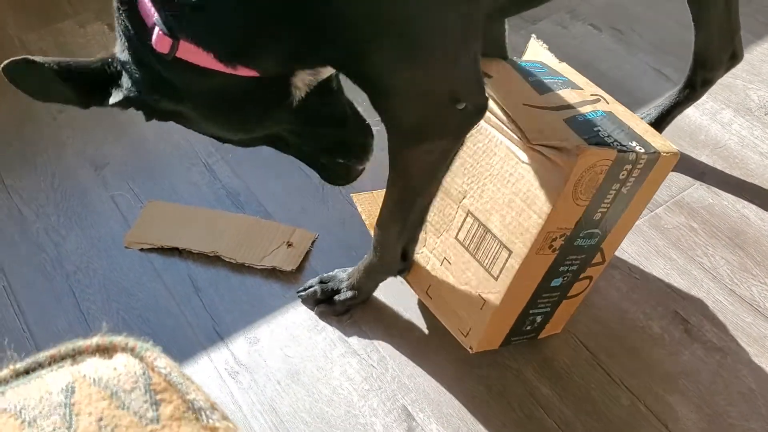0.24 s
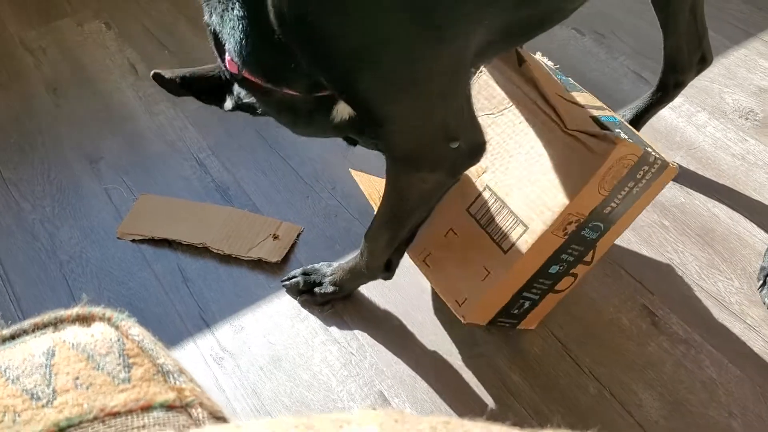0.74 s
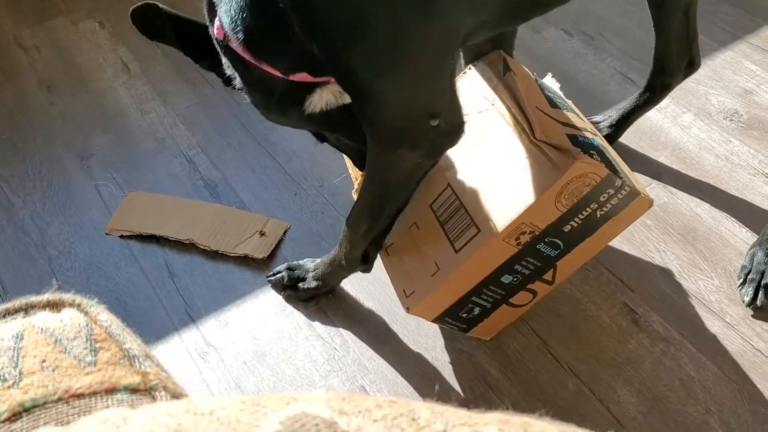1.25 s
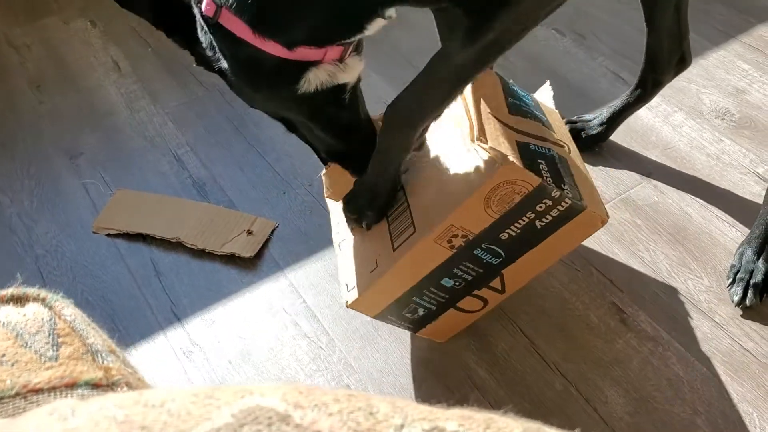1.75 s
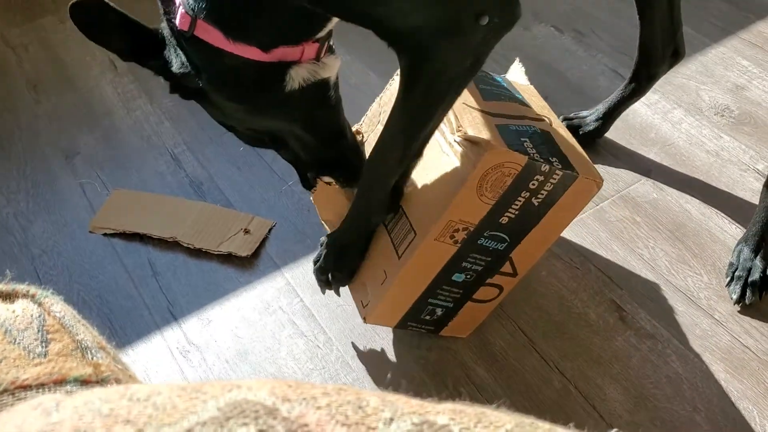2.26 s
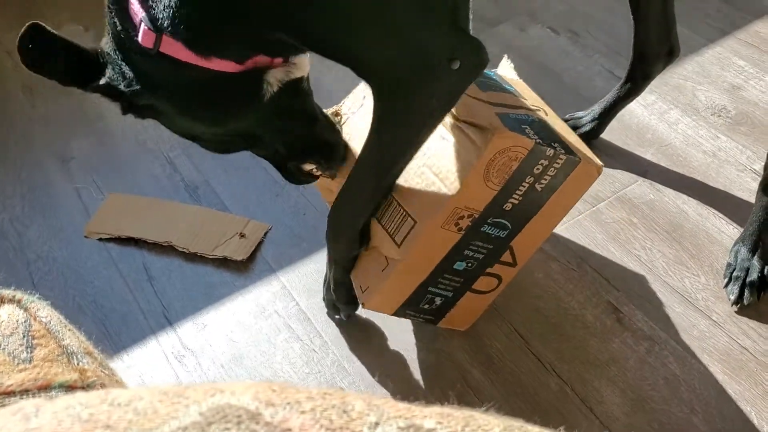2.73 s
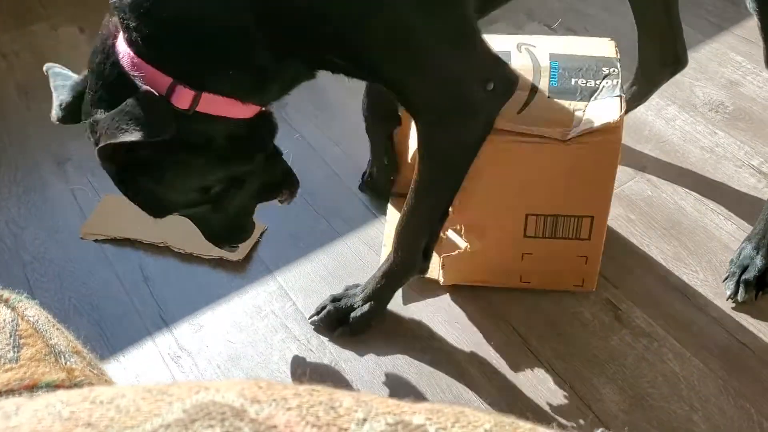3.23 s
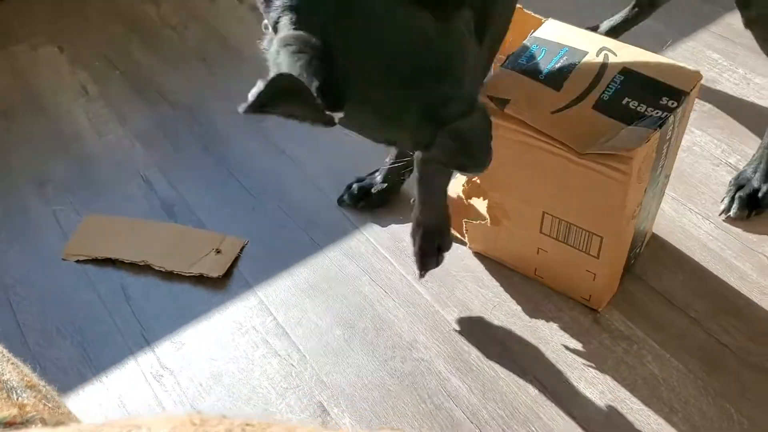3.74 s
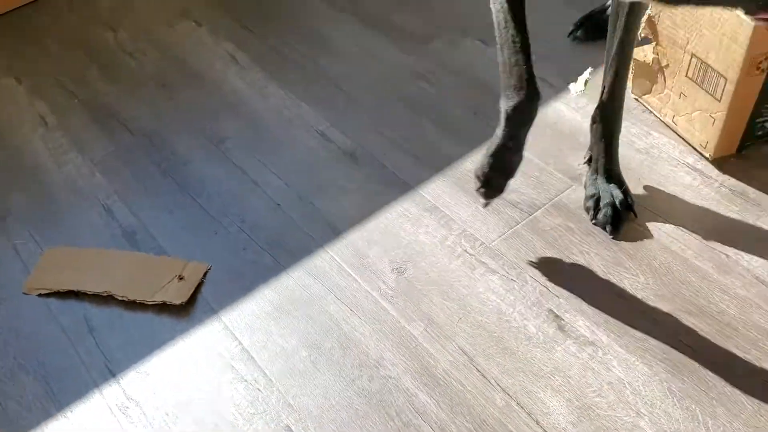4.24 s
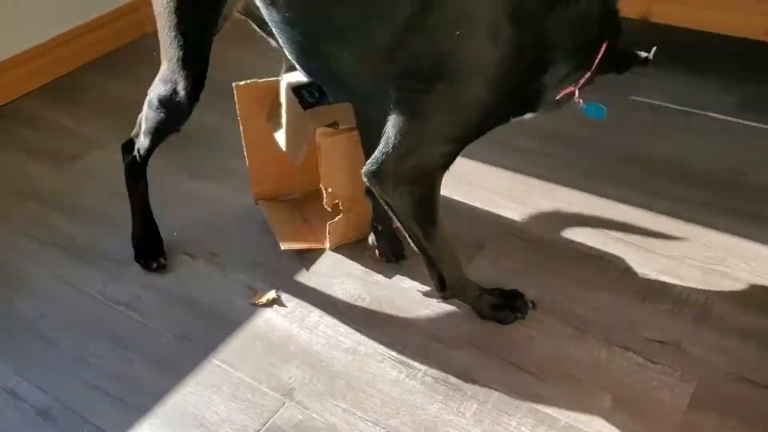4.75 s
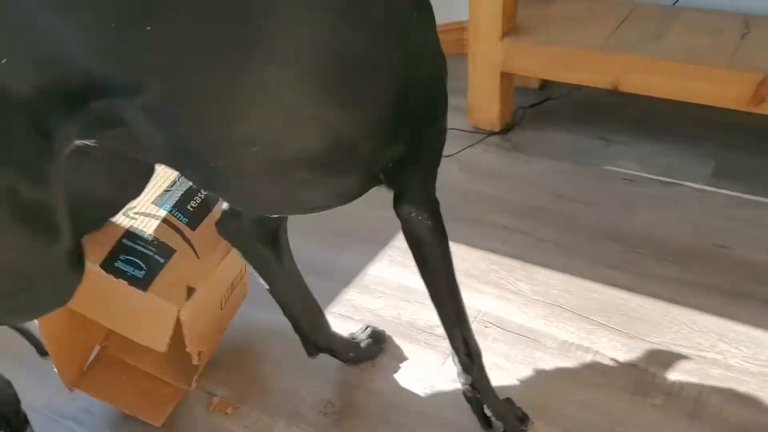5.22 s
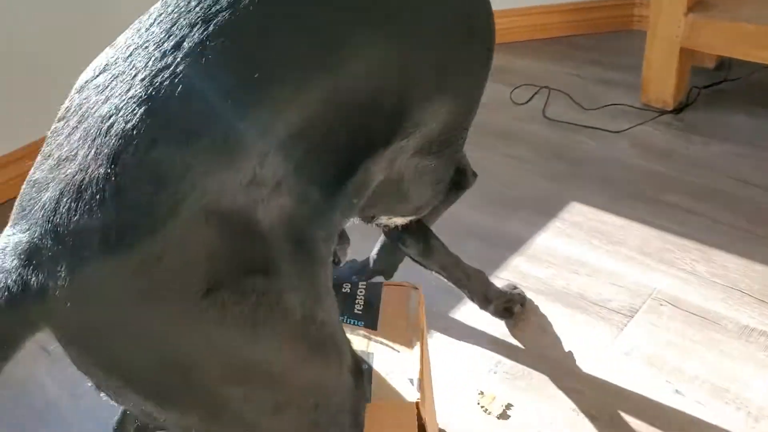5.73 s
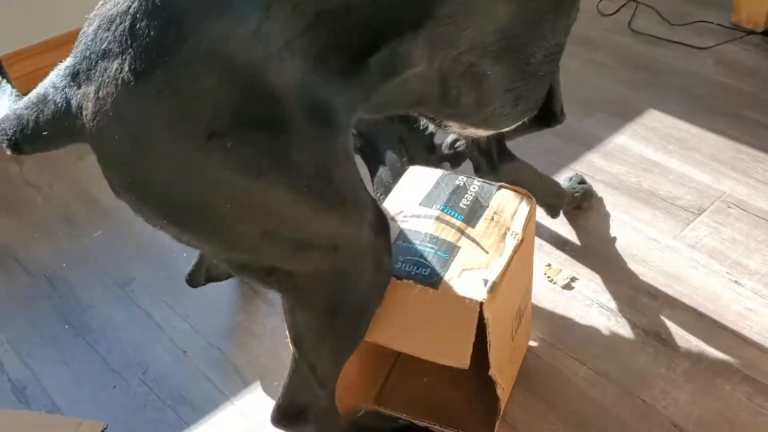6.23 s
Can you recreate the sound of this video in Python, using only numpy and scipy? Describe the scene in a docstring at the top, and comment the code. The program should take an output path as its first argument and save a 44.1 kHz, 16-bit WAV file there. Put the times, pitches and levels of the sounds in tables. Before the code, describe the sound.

A dog bites and tears a cardboard box, with loud sharp cracks, short rips and hollow knocks on a hard living-room floor.

```python
"""First comes the end of a faint drag with a low rumble, then loud cracks, a rip and hollow knocks: close by,
a dog bites, tears and shoves a cardboard box over a hard floor in a living room. Creases, rips and skids are
noise bursts and tiny random breaks through cardboard spectra; knocks and a collar tag are decaying modes.
Drags rub and rumble on and off beneath, over faint steady air; every sound gets scatter and a room tail."""
import sys
import numpy as np
from scipy import signal
from scipy.fft import rfft, irfft
from scipy.io import wavfile

SR = 44100
rng = np.random.default_rng(int(sys.argv[2]) if len(sys.argv) > 2 else 0)


def unload_wav(signal):
    """Save mono or channel-first audio to the path in sys.argv[1] as 16-bit WAV at rate SR, clipped to [-1, 1]."""
    wavfile.write(
        sys.argv[1],
        SR,
        np.round(np.clip(np.atleast_2d(signal).T, -1, 1) * 32767).astype(np.int16),
    )


N = 285900

# Event levels are balanced among themselves; each layer then has its own trim.
# a crease or flute of the cardboard snaps: [t/s, level/dB, body below 1 kHz/dB, crumpling after it/dB]
CREASE_SNAPS = [(0.101, 0, 7.5, 3.5), (0.194, 0, 4.5, -25), (0.205, -3.5, 1, -10), (0.799, -21.5, 0, 5.5),
                (1.005, -2.5, -4, -2), (1.176, -5.5, 7.5, 6), (1.225, -2, 8, -8), (1.315, -1.5, 0.5, 1),
                (1.446, 3, 5, -4), (1.705, -19, 5, 10.5), (1.809, -6.5, -4.5, -15), (2.022, -12, 1.5, 5),
                (2.175, -2, 1, -5), (2.22, -6, 10.5, 7.5), (2.234, -12.5, 4, 0), (2.293, -5.5, -5, 12),
                (2.572, -20.5, -8, 11.5), (2.801, -3.5, -5, 2), (2.854, -8, -0.5, 13),
                (3.876, -14.5, 14, 11), (3.922, -12, 10, -4), (4.465, -20, -7, 11),
                (4.712, -11.5, 10, 10.5), (4.734, -2, 20, -1), (5.168, -11, 38, 13), (5.238, -12, 29, 13),
                (5.395, -18, -24, 15), (5.452, -18.5, 3, 8.5), (6.014, -26.5, 5, 7.5),
                (6.262, -20.5, 7, 1.5), (6.308, -25, -8, 4)]
# the teeth rip the cardboard: [start t/s, end t/s, level/dB]
TEETH_TEARS = [(0.101, 0.22, -34.5), (0.581, 0.813, -58.5), (1.179, 1.212, -39), (1.225, 1.274, -36),
               (1.463, 1.506, -39.5), (1.945, 2.037, -33.5), (2.176, 2.25, -29), (2.292, 2.323, -29.5),
               (2.565, 2.618, -37), (3.027, 3.085, -40.5), (3.76, 3.811, -35), (3.85, 3.922, -32),
               (4.003, 4.068, -53), (4.237, 4.316, -37), (5.053, 5.087, -38.5)]
# the box or a paw knocks on the floor: [t/s, level/dB, strongest ring f/Hz, hollow ring level/dB]
FLOOR_KNOCKS = [(0.124, -3, 75, -20.5), (0.195, -8.5, 538, -4.5), (0.206, -2.5, 175, -7),
                (0.221, -12, 77.7, -9), (0.745, -33.5, 85, -5.5), (0.8, -11.5, 174.6, -18),
                (1.231, -17, 553, -3.5), (1.335, -20.5, 181, -23), (1.554, -23.5, 185, -30),
                (1.704, -26.5, 355, 0), (2.023, -14, 93, -12), (2.227, -13.5, 174, -8),
                (2.584, -16.5, 92, -27), (2.8, -10, 490, -4.5), (2.857, -9, 240, -11),
                (2.883, -4.5, 116, -14.5), (3.274, -17.5, 74, -16.5), (3.336, -19.5, 83, -18),
                (3.871, -16, 583, -6.5), (3.924, -12.5, 309, -6.5), (4.111, -10.5, 310, -14.5),
                (4.264, -21, 83, -3.5), (4.304, -13, 310, -31), (4.365, -12, 97, -8.5),
                (4.391, -14, 253, -11), (4.443, -22.5, 74, -0.5), (4.644, -22, 137, -8.5),
                (4.737, -7, 623, -9), (4.8, -4.5, 337, -5.5), (4.974, -10, 420.5, -9.5),
                (5.165, -6.5, 132, -8.5), (5.233, -14, 470, -5), (5.285, -3.5, 152, -6),
                (5.404, -10, 464.4, -4.5), (5.524, -15, 114, -18), (5.64, -20, 106, -6),
                (6.087, -16.5, 144, -13.5), (6.165, -23, 98, -35), (6.314, -20, 85.3, -28)]
# a corner of the box or a paw skids on the floor: [start t/s, end t/s, level/dB, body level/dB]
FLOOR_SCRAPES = [(0.185, 0.217, -41, 25.5), (0.476, 0.59, -46, 2), (2.813, 2.883, -27.5, -1.5),
                 (3.106, 3.137, -40, -0.5), (3.242, 3.282, -32, -4), (3.409, 3.422, -39, -8),
                 (3.913, 3.948, -25.5, 1.5), (4.372, 4.528, -37.5, 2), (4.583, 4.605, -22, -11),
                 (4.725, 4.761, -21.5, 4), (4.752, 4.796, -25, -8), (5.16, 5.194, -36, 2.5),
                 (5.222, 5.3, -27.5, 2.5), (5.568, 5.588, -30.5, -10), (6.027, 6.146, -42.5, 7),
                 (6.363, 6.413, -42.5, -15)]
# a claw clicks on the boards: [t/s, level/dB]
CLAW_CLICKS = [(3.236, -8), (3.939, -11), (4.046, -13), (4.587, -7.5), (5.276, -8), (5.524, -15.5),
               (5.571, -8)]
# the dog drags or worries the box: [start t/s, end t/s, level/dB, rumble re level/dB],
# with the rumble high when its weight is on the box
BOX_DRAGS = [(-0.03, 0.055, -43, 3), (0.2, 0.288, -49, 14), (0.353, 0.818, -52, 2), (0.802, 0.89, -44, 3.5),
             (0.996, 1.033, -43.5, 0), (1.19, 1.39, -45.5, 3), (1.476, 1.587, -37.5, -10),
             (1.712, 1.863, -40.5, -5), (1.908, 2.172, -40.5, -1.5), (2.133, 2.333, -40.5, 4),
             (2.347, 2.54, -45, -18), (2.53, 2.795, -40.5, -5), (2.855, 2.988, -38.5, 3.5),
             (2.996, 3.207, -42, -6), (3.3, 3.484, -46, 5.5), (3.803, 4.086, -38, 3.5),
             (4.084, 4.24, -43, 2), (4.273, 4.717, -35.5, 3), (4.69, 4.92, -40, 10),
             (4.94, 5.163, -42.5, 1), (5.172, 5.454, -36.5, 6.5), (5.535, 5.77, -43, 2.5),
             (5.991, 6.19, -44.5, 8.5), (6.238, 6.448, -48, -2)]
# the collar tag clinks: [t/s, level/dB, brightness/dB per octave, share of its free ringing time]
TAG_CLINKS = [(3.657, -47, -2, 0.36), (4.386, -31, 6, 0.31)]

# modes of the box on the floor, before each blow detunes them: [f/Hz, level/dB, t60/s]
BOX_MODES = [(65.5, 1.5, 0.2), (77.1, 3.5, 0.29), (105, 5, 0.17), (161.7, 8.5, 0.13), (180.5, 0, 0.26),
             (253.3, -3.5, 0.18), (320.2, 3, 0.09), (398.5, 1, 0.08), (455, 2, 0.12), (543, -5.5, 0.13),
             (624, -13, 0.19), (872, -12.5, 0.11)]
# modes of the metal tag when it swings free: [f/Hz, level/dB, t60/s]
TAG_MODES = [(4715, -1, .6), (4880, -10, .2), (5405, -11, .2), (6406, 0, .28), (8931, -15, .2),
             (11250, -11, .4), (12885, -3, .3), (14358, -3, .28)]
# short resonances of a cardboard flap, before each bend shifts them: [f/Hz]
FLAP_RINGS = [900, 1430, 1530, 3504]

# Spectra give only the tone colour: each filter is scaled to energy 1.
# splitting cardboard: [f/Hz, level/dB]
CRACK_SPECTRUM = [(80, -22), (250, -7), (500, -1), (1000, 1), (1600, -1), (2200, -4), (3400, 0), (5500, -5),
                  (8500, -13), (12300, -8), (16000, -9)]
# teeth or edges rasping over the fibres: [f/Hz, level/dB]
RASP_SPECTRUM = [(700, -15.5), (1500, -13), (2200, -5), (3300, -1), (4500, -3), (6000, -3), (8500, -11.5),
                 (10500, -11.5), (12300, -6), (14500, -12), (16000, -19)]
# the panels shaken by the rasp: [f/Hz, level/dB]
BODY_SPECTRUM = [(150, -1.5), (330, 6.5), (480, 8.5), (630, 4), (760, 0.5), (920, 2.5), (1300, -3),
                 (1700, -7), (2500, -13.5), (5000, -57)]
# the fizz of parting fibres: [f/Hz, level/dB]
FIZZ_SPECTRUM = [(3000, -30), (6000, -8), (8500, -4), (12500, 0), (16000, -4)]
# the rumble inside the dragged box: [f/Hz, level/dB]
RUMBLE_SPECTRUM = [(15, -35), (32, -25.5), (50, 2), (75, 6.5), (130, 1.5), (175, 0.5), (210, -2),
                   (320, -3.5), (375, -15), (450, -14.5), (650, -12), (1500, -61.5)]
# the faint steady noise: [f/Hz, level/dB]
AIR_SPECTRUM = [(20, -6), (60, 0), (200, -2), (1000, -11), (4000, -17), (16000, -28)]

# reverberation of the room: [f/Hz, t60/s]
ROOM_T60 = [(100, 0.13), (260, 0.52), (700, 0.34), (1840, 0.43), (4850, 0.24), (12800, 0.24)]
# room tail against direct sound, before each layer's wet trim: [f/Hz, level/dB]
ROOM_WET = [(60, -3), (250, -5), (600, -1), (1200, 4), (4000, 1.5), (11000, 2), (15500, -3)]
# left-right likeness of the room tail: [f/Hz, likeness 0 to 1, clipped at 1]
ROOM_LIKENESS = [(60, 1), (130, 1), (250, 0.66), (500, 0.71), (1000, 0.039), (2000, 0.01)]
# left microphone minus right: [f/Hz, level/dB]
MIC_BALANCE = [(100, -1), (900, 0), (2000, -1.5), (4000, -7), (8000, -5), (12500, -8)]

SPLIT_S = 0.0014  # decay constant of a splitting crease
PANEL_T60_S = 0.13  # how long the struck panel rings
# thud of a panel that rings at 100 Hz, before the layer trim; small, higher panels thud less
THUD_DB, THUD_DB_PER_OCTAVE = -13, -2
DRAG_RISE_S, DRAG_SAG_DB_PER_S = 0.02, 9.5  # a drag takes hold quickly and tires
RASP_STOP_DB_PER_S, RUMBLE_STOP_DB_PER_S = 133, 105.5  # once it ends, the rumble outlasts the rasp
AIR_DB = -67  # rms of the air before the room
EDGE_HZ = 15950  # upper band limit


def snaps(level_db=2, wet_db=-2, treble_db=0.0, lag_s=0.0014):
    """Creases give way: the larger the panel that they shake, the more body the crack has."""
    out = np.zeros((2, N))
    for s, db, body_db, crumple_db in CREASE_SNAPS:
        snap = gain_of(db + level_db) * crack(crumple_db, body_db, treble_db)
        add(out, s + lag_s, room(snap, wet_db))
    return out


def crack(crumple_db, body_db, treble_db, split_db=3, crumple_s=0.006, flap_db=-8, flap_s=0.002,
          flap_db_per_octave=5, count=3000):
    """A millisecond of splitting, a brief ring of the flap, then crumpling that dies away."""
    t = np.arange(count) / SR
    split = rng.standard_normal(count) * np.exp(-t / SPLIT_S)
    crumple = fibres(count, per_s=1500, spread_db=9, hiss=0.18) * np.exp(-t / crumple_s)
    # each bend stiffens the flap differently; a quick snap favours the high ring
    flap_hz = np.array(FLAP_RINGS) * rng.uniform(0.97, 1.06, len(FLAP_RINGS))
    flap_gain = gain_of(flap_db_per_octave * np.log2(flap_hz / flap_hz[0]))
    flap = flap_gain @ np.sin(2 * np.pi * flap_hz[:, None] * t) * np.exp(-t / flap_s)
    parts = [(split_db, split), (crumple_db, crumple), (flap_db, flap)]
    force = sum(gain_of(part_db) * part / np.linalg.norm(part) for part_db, part in parts)
    shade = [(900, body_db), (2600, 0), (5000, 0), (9500, treble_db)]  # f/Hz, level/dB
    return signal.fftconvolve(force, pulse(CRACK_SPECTRUM, shade))


def tears(level_db=-3, wet_db=-1, body_db=-1.0, fizz_db=-3.5):
    """Ripping cardboard: rasp, body and the fizz of parting fibres, always in the same blend."""
    out = np.zeros((2, N))
    for start, end, db in TEETH_TEARS:
        rip = gain_of(db + level_db) * stroke(end - start, body_db, fizz_db)
        add(out, start, room(rip, wet_db))
    return out


def stroke(length_s, body_db, fizz_db, taper=0.36):
    """A run of fibres catches and breaks in quick succession and shakes the panel around it."""
    count = round(max(length_s, 0.005) * SR)
    breaks = fibres(N // 20, per_s=900, spread_db=4.5, hiss=0.25)
    force = (breaks * clumps(N // 20, spread_db=3.5, per_s=170))[:count]
    force = evened(force) * signal.windows.tukey(len(force), taper)
    body = gain_of(body_db) * pulse(BODY_SPECTRUM)
    fizz = gain_of(fizz_db) * pulse(FIZZ_SPECTRUM)
    return signal.fftconvolve(force, pulse(RASP_SPECTRUM) + body + fizz)


def knocks(ring_db=-5, modes_db=6.0, wet_db=-2, rise_s=0.0027, detune=0.067, count=10000):
    """Each blow rings one struck panel and the box's modes, a little detuned as it is bent."""
    out, t = np.zeros((2, N)), np.arange(count) / SR
    mode_hz, mode_db, mode_t60 = np.transpose(BOX_MODES)[:, :, None]
    for s, db, hz, hollow_db in FLOOR_KNOCKS:
        bend, phase = rng.uniform(-0.89, 1, (2, len(BOX_MODES), 1))
        thud_db = THUD_DB + THUD_DB_PER_OCTAVE * np.log2(hz / 100)
        # low modes follow the thud, high modes the hollow ring
        weight_db = read([(100, thud_db), (350, hollow_db)], mode_hz) + mode_db - 60 * t / mode_t60
        bent_hz = mode_hz * (1 + detune * bend)
        modes = gain_of(weight_db) * np.sin(2 * np.pi * bent_hz * t + np.pi * phase)
        hollow = gain_of(modes_db) * modes.sum(0) / np.sqrt(len(BOX_MODES))
        panel = gain_of(ring_db - 60 * t / PANEL_T60_S) * np.sin(2 * np.pi * hz * t)
        contact = 1 - np.exp(-t / rise_s)  # soft cardboard takes up the blow gradually
        add(out, s, room(gain_of(db) * contact * (panel + hollow), wet_db))
    return out


def scrapes(level_db=-3, wet_db=-1, fizz_db=-19):
    """Skids on the boards: little fizz, and as much body as the box is pressed down."""
    out = np.zeros((2, N))
    for start, end, db, body_db in FLOOR_SCRAPES:
        skid = gain_of(db + level_db) * stroke(end - start, body_db, fizz_db)
        add(out, start, room(skid, wet_db))
    return out


def claws(level_db=2, wet_db=-2, scratch_db=5.0, body_db=-18, treble_db=-2.0, lag_s=0.0016):
    """Claws land with a thin crack and a short scratch."""
    out = np.zeros((2, N))
    for s, db in CLAW_CLICKS:
        click = gain_of(db + level_db) * crack(scratch_db, body_db, treble_db)
        add(out, s + lag_s, room(click, wet_db))
    return out


def drags(rasp_db=-3.5, body_db=-4.0, rumble_db=-1.5):
    """Edges catch and slip on the floor: a fine rasp, coarser chatter of the panels, a rumble inside the box."""
    grip = clumps(N, spread_db=4.5, per_s=80)
    rub = grip * effort(0, RASP_STOP_DB_PER_S)
    shake = grip * effort(0.91, RUMBLE_STOP_DB_PER_S)
    fine = coloured(rub * fibres(N, per_s=1800, spread_db=2.0, hiss=1.0), RASP_SPECTRUM)
    chatter = coloured(rub * fibres(N, per_s=600, spread_db=5.0, hiss=0.78), BODY_SPECTRUM)
    drum = coloured(shake * fibres(N, per_s=230, spread_db=0.5, hiss=0.38), RUMBLE_SPECTRUM)
    return gain_of(rasp_db) * fine + gain_of(body_db) * chatter + gain_of(rumble_db) * drum


def effort(rumble_share, stop_db_per_s):
    """The gain of all drags over time, for a layer that takes the given share of their rumble."""
    t, power = np.arange(0, N, 64) / SR, 0
    for start, end, db, rumble_db in BOX_DRAGS:
        sag_db = DRAG_SAG_DB_PER_S * np.maximum(t - start, 0)
        stop_db = stop_db_per_s * np.maximum(t - end, 0)
        rise = np.clip((t - start) / DRAG_RISE_S, 0, 1)
        power += (rise * gain_of(db + rumble_share * rumble_db - sag_db - stop_db)) ** 2
    return np.interp(np.arange(N) / SR, t, np.sqrt(power))


def tag(wet_db=-2, rattle_db=2, rattle_s=0.009, swing_db=5, count=22000):
    """The metal tag rattles on its ring and sings unevenly as it swings; against the fur it is damped sooner."""
    out, t = np.zeros((2, N)), np.arange(count) / SR
    hz, mode_db, t60 = np.transpose(TAG_MODES)[:, :, None]
    for s, db, bright_db, free in TAG_CLINKS:
        fade_db = 60 * t / (t60 * max(free, 0.05))
        level_db = mode_db + bright_db * np.log2(hz / hz[0]) - fade_db
        swing = np.array([clumps(count, swing_db, per_s=110) for _ in TAG_MODES])
        ring = swing * gain_of(level_db) * np.sin(2 * np.pi * (hz * t + rng.random(hz.shape)))
        rattle = coloured(fibres(count, per_s=1500, spread_db=2.5, hiss=0.33), RASP_SPECTRUM)
        rattle = gain_of(rattle_db) * rattle * np.exp(-t / rattle_s)
        add(out, s, room(gain_of(db) * (ring.sum(0) + rattle), wet_db))
    return out


def air():
    """Faint steady noise: random pressure with most of its strength in the bass."""
    return gain_of(AIR_DB) * coloured(rng.standard_normal(N), AIR_SPECTRUM)


def wandering(x, wet_db, count=14):
    """A lasting sound crossfades from spot to spot as the box is pushed about."""
    out, hop = np.zeros((2, N)), N // count
    for k in range(count + 1):
        at = np.arange(max(k - 1, 0) * hop, min((k + 1) * hop, N))
        crossfade = np.cos(np.pi / 2 * (at / hop - k)) ** 2
        add(out, at[0] / SR, room(x[at] * crossfade, wet_db))
    return out


def room(x, wet_db, scatter_db=-8, scatter_s=0.0013, size=18000):
    """One spot in the room: direct sound, quick scatter off box and floor, and its own diffuse tail."""
    hz, t, (left, other) = signal.stft(rng.standard_normal((2, size)), SR, nperseg=256)
    same = np.clip(read(ROOM_LIKENESS, hz), 0, 1)[:, None]  # the microphones agree mostly in the bass
    right = same * left + np.sqrt(1 - same ** 2) * other
    t60 = read(ROOM_T60, hz)[:, None]
    unit_energy = np.sqrt(np.log(1e6) / (t60 * SR))  # a long tail is no stronger in total than a short one
    fade = gain_of(read(ROOM_WET, hz)[:, None] + wet_db - 60 * t / t60) * unit_energy
    tail = signal.istft(np.array([left, right]) * fade, SR, nperseg=256)[1]
    response = np.pad(tail, ((0, 0), (130, 0)))  # the tail starts 130 samples late
    scatter = rng.standard_normal((2, 512)) * np.exp(-np.arange(512) / (scatter_s * SR))
    scatter = high_pass(scatter, hz=1070)  # long waves bend around the box
    scatter /= np.linalg.norm(scatter, axis=1, keepdims=True)
    response[:, :scatter.shape[1]] += gain_of(scatter_db) * scatter
    # the direct sound reaches each microphone 0 to 4 samples late
    response[[0, 1], rng.integers(0, 5, 2)] += 1
    return signal.fftconvolve(x[None], response, axes=1)


def fibres(count, per_s, spread_db, hiss):
    """Tiny breaks of very uneven size over a smooth rub, rms 1."""
    chance = rng.random(count)
    strength = rng.exponential(1, count)
    rub = rng.standard_normal(count)
    breaks = (chance < per_s / SR) * np.sign(rub) * gain_of(spread_db * np.minimum(strength, 4))
    return evened(evened(breaks) + hiss * rub)


def clumps(count, spread_db, per_s=140):
    """Uneven gain, drifting between random levels like a tear that catches and lets go at each flute."""
    steps = rng.standard_normal(round(N / SR * per_s) + 2)
    drift = np.interp(np.arange(count) * per_s / SR, np.arange(len(steps)), steps)
    return evened(gain_of(spread_db * drift))


def pulse(*spectra, size=2048):
    """The causal click of energy 1 that has the summed dB spectra."""
    hz = abs(np.fft.fftfreq(size, 1 / SR))
    log_gain = np.log(gain_of(sum(read(points, hz) for points in spectra)))
    # minimum phase: the energy comes as early as the spectrum allows
    click = np.fft.ifft(np.exp(np.conj(signal.hilbert(log_gain)))).real
    return click / np.linalg.norm(click)


def coloured(x, spectrum):
    """Gives an excitation the tone colour of a spectrum."""
    return signal.oaconvolve(x, pulse(spectrum))[:len(x)]


def high_pass(x, hz, order=2):
    """Takes away what lies below hz."""
    return signal.sosfilt(signal.butter(order, hz, "highpass", fs=SR, output="sos"), x)


def gain_of(db):
    """Decibels to gain."""
    return 10 ** (np.asarray(db) / 20)


def evened(x):
    """Scales to rms 1."""
    return x / np.sqrt(np.mean(x ** 2) + 1e-20)


def read(points, hz):
    """Reads a table on a log-frequency axis."""
    f, value = np.transpose(points)
    return np.interp(np.log(hz + 1), np.log(f + 1), value)


def add(mix, s, sound):
    """Adds a two-channel sound to the mix at s seconds, or at the start if s is negative."""
    part = mix[:, max(round(s * SR), 0):][:, :sound.shape[1]]
    part += sound[:, :part.shape[1]]


def scene():
    """All sources in the room, over its faint steady noise."""
    events = snaps() + tears() + knocks() + scrapes() + claws() + tag()
    return events + wandering(drags() + air(), wet_db=1.5)


def record(dry):
    """The left microphone hears less treble than the right; both lose the deepest bass; then the band limit."""
    hz = np.fft.rfftfreq(N, 1 / SR)
    lean_db = read(MIC_BALANCE, hz) / 2  # half the difference on each side
    leaning = irfft(rfft(dry) * gain_of([lean_db, -lean_db]), N)
    heard = high_pass(leaning, hz=39.7, order=3)
    low_pass = signal.firwin(401, EDGE_HZ, window=("kaiser", 9), fs=SR)
    return signal.oaconvolve(heard, low_pass[None], "same")


dry = scene()
out = record(dry)
unload_wav(out)
```